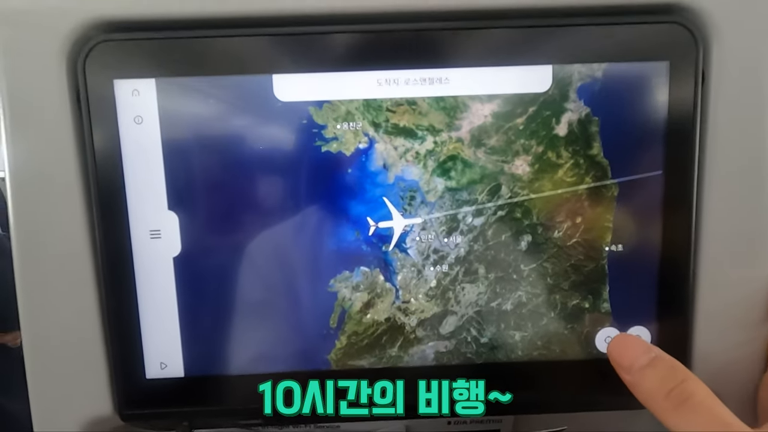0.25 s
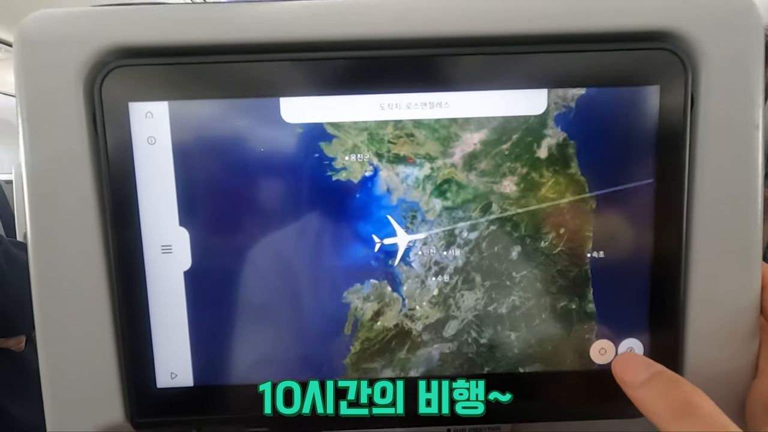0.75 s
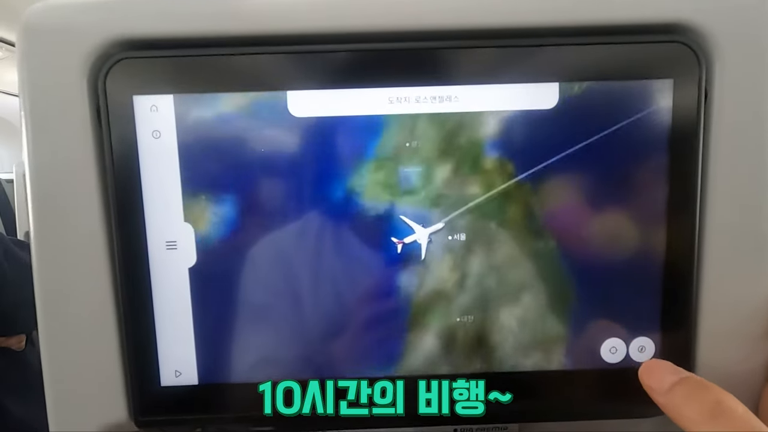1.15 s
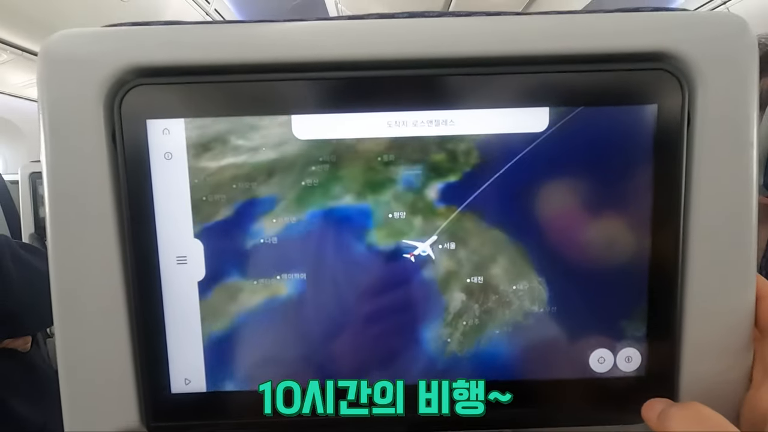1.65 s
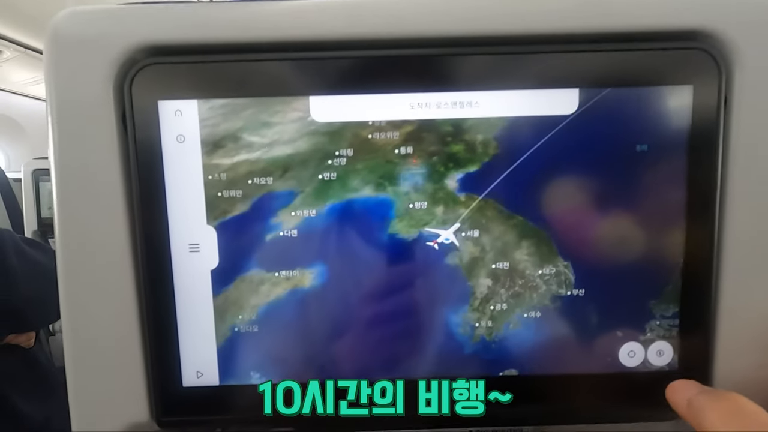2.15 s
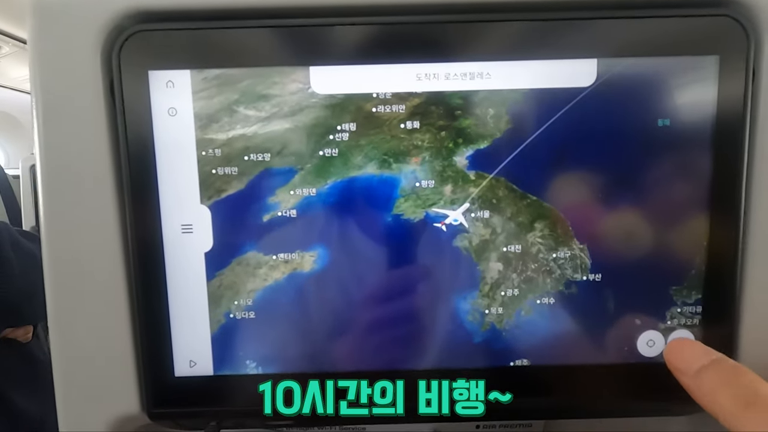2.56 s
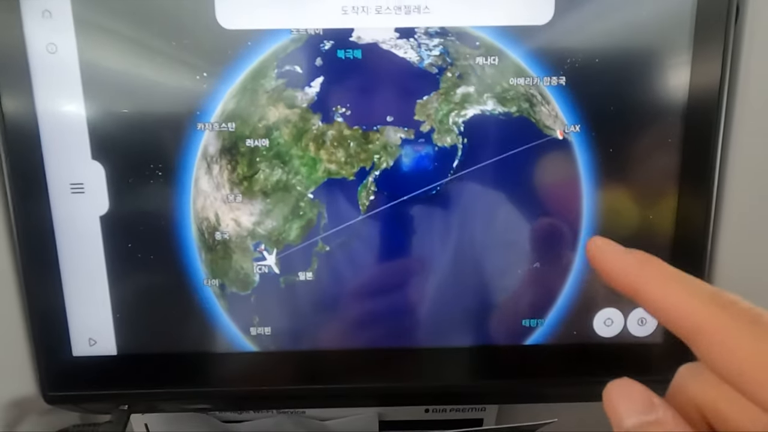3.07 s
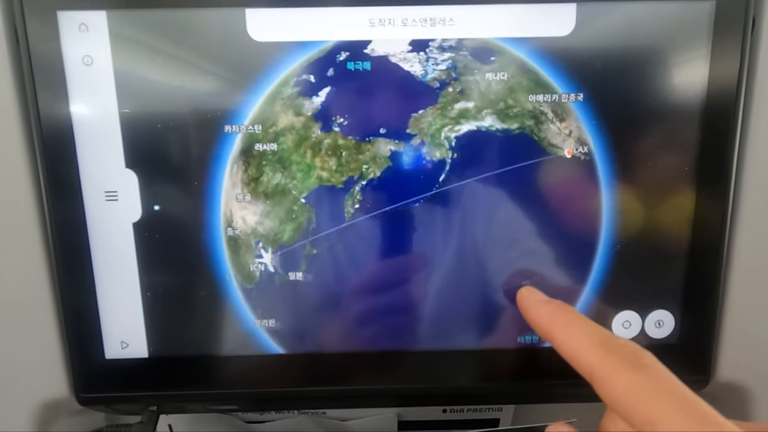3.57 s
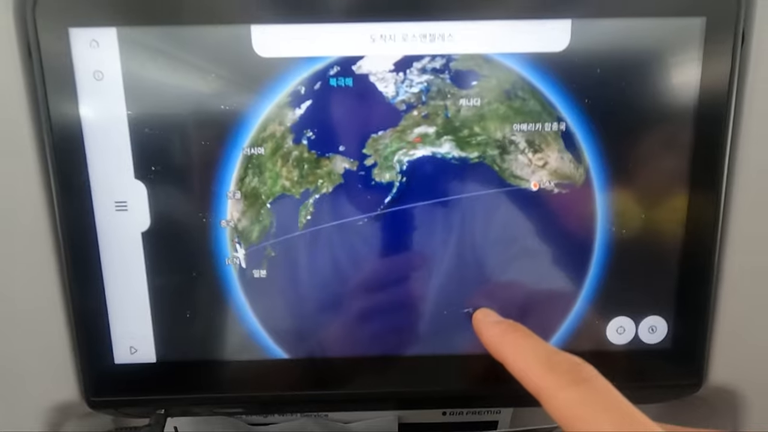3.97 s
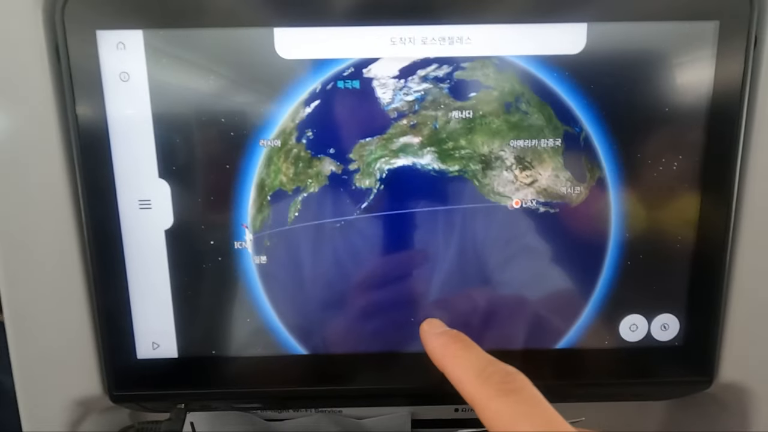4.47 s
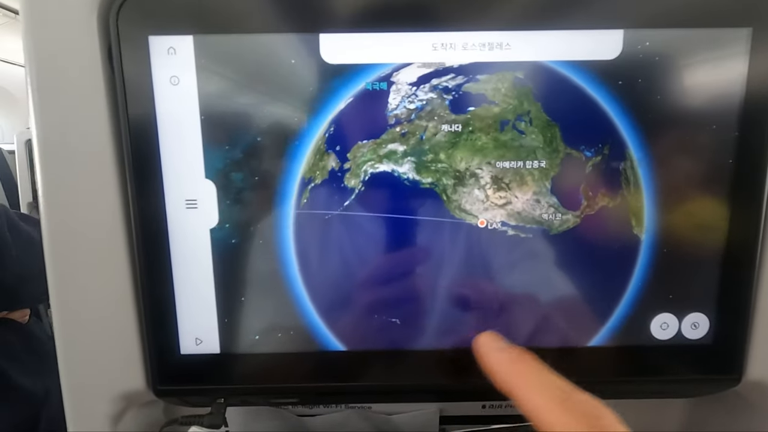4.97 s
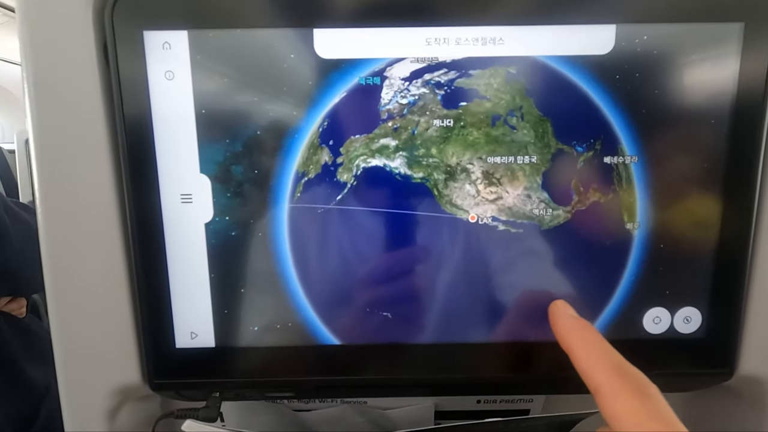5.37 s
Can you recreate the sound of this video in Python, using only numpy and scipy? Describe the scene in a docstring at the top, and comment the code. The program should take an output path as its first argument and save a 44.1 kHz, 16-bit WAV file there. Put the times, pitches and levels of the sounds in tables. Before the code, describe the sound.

Steady low rumble inside a flying passenger plane, cut by one click halfway, with faint touch rustles and a tiny plastic tick.

```python
"""The roar of an airliner cabin in flight: the airframe shudders, the cabin air booms, the wall panels drone.
The roar is noise, coloured by the cabin and split into bands; the boom also holds a wavering note.
Above it are airflow hiss and narrow bands of noise that briefly swell, thin whines (wavering sine tones),
soft rustles and a swish (noise bursts), and a tiny tick with its rebound (dying sine tones).
Halfway, a click jumps to a later moment of the flight: boomier, a little brighter, wide instead of centred."""
import sys
import numpy as np
from scipy import signal
from scipy.fft import irfft
from scipy.io import wavfile
from scipy.ndimage import uniform_filter1d

SR = 44100
rng = np.random.default_rng(int(sys.argv[2]) if len(sys.argv) > 2 else 0)


def wav_out(sig):
    """Save sig, one row per channel (or a flat mono array), as 16-bit PCM at SR to the path in sys.argv[1]."""
    wavfile.write(sys.argv[1], SR, np.round(np.clip(np.atleast_2d(sig).T, -1, 1) * 32767).astype(np.int16))


N = 248194

JUMP_S = 2.79522
TIME = np.arange(N) / SR
LATE = TIME >= JUMP_S
HZ = np.fft.rfftfreq(2 ** 18, 1 / SR)

# basic colour of the roar before and after the jump; the low bands get their final level further on:
# pitch_hz, early_level_db (per Hz), late_level_db (per Hz)
ROAR_COLOUR = [(10, -35, -42.5), (58.7, -43.5, -40.5), (105.9, -46, -47), (186.8, -48, -59.5),
               (229, -59, -59.5), (336, -61.5, -62), (506, -70, -71.5), (990, -76.5, -76.5),
               (2220, -84.5, -83), (3620, -91.5, -91), (4440, -96, -95.5), (7200, -104, -101),
               (8800, -112.5, -111), (13000, -119, -118)]
# resonances of airframe, panels, ducts and trim: pitch_hz, width_hz, early_lift_db, late_lift_db
CABIN_RESONANCES = [(23.2, 8.4, 2, 8.5), (39.2, 13, 9.5, 3.5), (114.7, 11, -2.5, -3.5), (146.8, 26, 8, 4),
                    (181, 17, 4, 7.5), (201.5, 20, 4.5, 6), (233.7, 42, 0.5, -2.5), (299.6, 59, 3.5, 2.5),
                    (425.5, 30, 0, 5.5), (590, 16, 3, 4), (666, 60, 5, 2), (716, 94, -2.5, -4),
                    (830, 23, 3.5, 0.5), (1148, 60, 4, 4.5), (1270, 330, 3.5, 3), (1460, 160, -0.7, 0.9),
                    (1690, 140, -2, -1), (2030, 210, 2.5, 1.8), (5430, 900, 0.5, 2)]
# borders between shudder, boom, drone and rush: pitch_hz
LOW_BAND_EDGES_HZ = [55, 112, 235]
HISS_EDGE_HZ = 1500  # border between rush and hiss
# the stereo image before the jump: pitch_hz, unrelated_part_db, left_lead_rad, left_minus_right_db
EARLY_STEREO = [(300, -100, 0, 0), (450, -50, 0, 0), (900, -39, 0, 0), (1800, -32, 0, 0),
                (10500, -19, 0, 0), (12000, -4, 0, 3)]
# the stereo image after the jump: pitch_hz, unrelated_part_db, left_lead_rad, left_minus_right_db
LATE_STEREO = [(60, -40, 0, .3), (230, -28, .07, .6), (430, -16, .2, 1.7), (600, -12, .15, .5),
               (900, -8, .35, 2.3), (1170, -11, .4, 3), (1550, -7, .35, 2.7), (2700, -7.5, .7, 2.6),
               (5000, -6.5, 0, 1.3), (8000, -4, 0, 3.7), (10000, -9, 0, 1.3), (12000, -3, 0, 5)]
# airframe shudder, the deepest band, before its random swells: start_s, level_db (rms)
SHUDDER_LEVEL = [(0, -24.5), (.5, -22.5), (.72, -23.5), (.9, -17), (1.08, -28.5), (1.33, -25), (1.46, -20),
                 (1.65, -25.5), (2.33, -19.5), (2.8, -27), (3.0, -17), (3.16, -29), (3.3, -21),
                 (3.779, -19.5), (3.92, -21), (4.4, -24), (5.05, -21.5), (5.6, -22)]
# boom of the cabin air, without its note and before random swells: start_s, level_db (rms)
BUFFET_LEVEL = [(0, -27.5), (.25, -23), (.48, -30), (.97, -29.5), (1.1, -25.5), (1.7, -27.5), (2.8, -28),
                (2.88, -22.5), (3.25, -24.5), (3.6, -26), (3.95, -23.5), (4.25, -26), (5.1, -22),
                (5.6, -26.5)]
# the boom's note, which builds up and wanders in pitch: start_s, pitch_hz, level_db (rms)
BOOM_NOTE = [(1.9, 88, -41), (2.4, 85.84, -30), (2.7, 85.66, -24), (2.8, 84.8, -42), (2.88, 76.84, -25),
             (3.3, 77.1, -23.5), (3.6, 75.8, -28.5), (3.92, 77.07, -23), (4.4, 80.8, -23),
             (4.65, 76.43, -23.5), (5.0, 81.74, -21), (5.25, 77.2, -23), (5.6, 68.16, -25)]
# drone of the wall panels, the upper bass, before its random swells: start_s, level_db (rms)
DRONE_LEVEL = [(0, -22), (.5, -22), (.62, -24.7), (.9, -25.5), (1.06, -19), (1.2, -24.5), (1.82, -22),
               (1.92, -25), (2.1, -23.5), (3.65, -24.5), (3.8, -27), (4.22, -21.5), (4.4, -24.5),
               (4.65, -24.5), (4.9, -24), (5.35, -25), (5.6, -24.5)]
# boost or cut of the airflow's lower part, the rush: start_s, gain_db
RUSH_GAIN = [(0, 1), (.35, 0.7), (1.0, 0.1), (2.75, -0.9), (2.9, 0.8), (3.6, 0.5), (4.1, -0.2), (5.0, -0.3),
             (5.6, 0.5)]
# boost or cut of the airflow's treble, the hiss: start_s, gain_db
HISS_GAIN = [(0, 1), (1.1, -0.16), (2.75, -0.3), (2.85, 1.2), (3.0, 1), (3.15, 0.5), (3.37, 1.1),
             (3.55, -0.1), (3.75, 0.8), (4.0, 0.5), (4.45, -0.6), (5.0, 0.3), (5.35, -1.2), (5.6, 2.2)]
# narrow bands of noise that briefly swell and sink back:
# centre_s, half_length_s, pitch_hz, width_hz, level_db (at peak)
NOISE_SWELLS = [(.1, .3, 1150, 60, -51), (0.282, 0.16, 450, 120.5, -48), (0.549, 0.5, 220.5, 26.1, -39),
                (2.8, 0.22, 1430, 90, -59.5), (3.096, .4, 2170, 170, -59.5), (3.497, .2, 377, 70, -46)]
# three whines whose levels vary over time, before their wander: pitch_hz
VARYING_WHINES_HZ = [2569, 5666, 10987]
# their levels, before a lift shared by all whines: start_s, lowest_level_db, middle_level_db, highest_level_db
VARYING_WHINE_LEVELS = [(.2, -76.5, -76, -94), (.6, -70.5, -84, -90), (2.1, -70, -84, -91),
                        (2.35, -64, -85, -96), (2.75, -72, -82, -96), (2.85, -65.5, -75, -88),
                        (3.4, -69, -76, -90.5), (4.1, -70, -76, -86.5), (4.33, -64, -75, -86.5),
                        (4.55, -67, -76, -88), (4.82, -66, -75, -88), (5, -63, -72.5, -84),
                        (5.12, -74, -73, -84.5), (5.6, -68, -75.5, -85)]
# whines with one level before and one after the jump, before the same lift:
# pitch_hz, early_level_db, late_level_db
STEPPED_WHINES = [(4133, -91, -75), (4899, -92, -75.7), (6212, -95, -87), (6374, -88, -88),
                  (7083, -89, -83), (8263, -93, -89), (8500, -90, -90), (9017, -100, -94),
                  (11332, -104, -91)]
# touches of hand and sleeve: peak_s, rise_s, fall_s, level_db (at peak), centre_hz, spread_octaves
RUSTLE_STROKES = [(.6, .049, .049, -74.5, 6500, .27), (1.45, .04, .1, -79, 12100, .14),
                  (1.67, .025, 0.21, -75, 10500, 0.35), (1.8, .012, .025, -79, 12000, .15),
                  (1.86, .005, .009, -74, 12200, 0.079), (2.13, .07, .07, -69, 7000, 0.24),
                  (3.415, .03, .045, -67, 8300, 0.24), (3.53, .035, .035, -70, 7800, .35),
                  (3.788, .014, 0.023, -56.5, 4900, .52), (3.82, .01, .018, -65, 5700, 0.57),
                  (3.985, .018, .018, -67, 6600, .34), (4.015, .014, .04, -64, 6200, .35),
                  (4.05, .012, 0.017, -57, 4300, .45), (4.627, .016, 0.019, -66, 7400, .1),
                  (5.003, .008, .01, -65, 5750, 0.061)]
# resonances of the swish, relative to each other: pitch_hz, width_hz, level_db
SWISH_RESONANCES = [(2900, 800, -0.5), (3980, 750, -2), (7200, 2300, -6), (10600, 2600, -19),
                    (12700, 1200, -21)]
# a plastic tick and its rebound: start_s, level_db
TICK_HITS = [(4.162, -44), (4.167, -51)]
# what the plastic rings with, relative to the hit: pitch_hz, level_db, time_to_fall_60_db_s
TICK_RINGS = [(4480, -3, 0.022), (4780, -2, .02), (7700, -14, .01)]


def amp(db):
    """Turns decibels into a gain."""
    return 10 ** (np.asarray(db) / 20)


def unit(x):
    """Scales a sound to an average strength (rms) of 1."""
    return x / np.sqrt(np.mean(x ** 2) + 1e-20)


def spectra(rows):
    """Joins the rows of a pitch table with straight lines on a log-pitch axis."""
    hz, *columns = np.transpose(rows)
    return [np.interp(np.log(HZ + 1), np.log(hz + 1), column) for column in columns]


def curves(rows):
    """Joins the rows of a time table with straight lines, one value per sample."""
    s, *columns = np.transpose(rows)
    return [np.interp(TIME, s, column) for column in columns]


def below(hz, order=12):
    """Low-pass gain: keeps what is below hz, more sharply with a higher order."""
    return 1 / np.sqrt(1 + (HZ / hz) ** (2 * order))


def white():
    """Random spectrum of a noise that is equally strong at every pitch, 0 dB per Hz."""
    random = rng.standard_normal(len(HZ)) + 1j * rng.standard_normal(len(HZ))
    return random * np.sqrt(SR * len(HZ) / 2)


def wave(spectrum):
    """Turns a spectrum into sound samples."""
    return irfft(spectrum)[..., :N]


def drift(hz):
    """Random wandering around 0, rms 1, with up to about hz swings a second."""
    points = rng.standard_normal(4000)
    # straight lines between random points lose a third of the power: give it back
    return np.interp(2 * hz * TIME, np.arange(len(points)), points) * np.sqrt(3 / 2)


def stroke(peak_s, rise_s, fall_s):
    """Loudness of a brush: a smooth hump that rises to its peak and falls away."""
    return np.exp(-((TIME - peak_s) / np.where(TIME < peak_s, rise_s, fall_s)) ** 2)


def steadied(x, span_s):
    """Evens out slow swells to rms 1 and leaves the fast flutter."""
    size = max(int(span_s * SR), 2)
    power = (x ** 2).mean(0)
    smooth_power = uniform_filter1d(uniform_filter1d(power, size), size)
    return x / np.sqrt(abs(smooth_power) + 1e-12)


def diffuse(stereo):
    """Noise at two close microphones: long bass waves reach both more alike than short treble waves."""
    apart_db, lead_rad, lean_db = spectra(stereo)
    shared = white()
    unrelated = amp(apart_db) * white()
    tilt = amp(lean_db / 2) * np.exp(.5j * lead_rad)
    return np.array([(shared + unrelated) * tilt, (shared - unrelated) / tilt])


def whines(level_db=1.0, wander_hz=2.5, fade_db=2.0):
    """Fans and electrics give thin tones that waver, and flutter in the cabin's standing waves."""
    out = np.zeros((2, N))
    varying = list(zip(VARYING_WHINES_HZ, curves(VARYING_WHINE_LEVELS)))
    stepped = [(hz, np.where(LATE, late_db, early_db)) for hz, early_db, late_db in STEPPED_WHINES]
    for hz, db in varying + stepped:
        angle = 2 * np.pi * np.cumsum(hz + wander_hz * drift(12)) / SR
        fade = drift(9)
        sway = LATE * drift(2.7)  # left and right move oppositely, only after the jump
        flutter_db = fade_db * np.array([fade + sway, fade - sway])
        out += np.sqrt(2) * amp(db + level_db + flutter_db) * np.sin(angle)
    return out


def noise_swells():
    """Narrow bands of noise that briefly swell and sink back."""
    out = np.zeros((2, N))
    early, late = diffuse(EARLY_STEREO), diffuse(LATE_STEREO)
    for centre_s, half_s, hz, width_hz, db in NOISE_SWELLS:
        colour = 1 / (1 + ((HZ - hz) / width_hz * np.sqrt(2)) ** 2) ** 2
        noise = late if centre_s > JUMP_S else early
        out += amp(db) * stroke(centre_s, half_s, half_s) * unit(wave(colour * noise))
    return out


def rustles(grain_db=1.5):
    """Hand and sleeve rub softly: short bursts of friction noise, made grainy by fast flicker."""
    out = np.zeros((2, N))
    grain = unit(amp(grain_db * drift(220)))
    early, late = diffuse(EARLY_STEREO), diffuse(LATE_STEREO)
    for peak_s, rise_s, fall_s, db, hz, octaves in RUSTLE_STROKES:
        colour = np.exp(-.5 * (np.log2((HZ + 1) / hz) / octaves) ** 2)
        noise = late if peak_s > JUMP_S else early
        out += amp(db) * stroke(peak_s, rise_s, fall_s) * unit(wave(colour * noise))
    return out * grain


def swish(peak_s=1.246, rise_s=0.012, fall_s=0.018, tail_s=.034, body_db=-51, hiss_db=-59.5):
    """One quick brush: resonant noise with a hollow body, and a brighter hiss that trails on."""
    colours = np.array([amp(db) / (1 + (2 * (HZ - hz) / width_hz) ** 2)
                        for hz, width_hz, db in SWISH_RESONANCES])
    hollow = np.array([hz < 5000 for hz, _, _ in SWISH_RESONANCES])
    body = unit(wave(colours[hollow].sum(0) * diffuse(EARLY_STEREO)))
    hiss = unit(wave(colours[~hollow].sum(0) * diffuse(EARLY_STEREO)))
    hollow_brush = amp(body_db) * stroke(peak_s, rise_s, fall_s) * body
    bright_brush = amp(hiss_db) * stroke(peak_s, rise_s, tail_s) * hiss
    return hollow_brush + bright_brush


def ticks(contact_s=.0004):
    """Plastic ticks and rebounds: each hit starts a few tones that die away fast."""
    out = np.zeros(N)
    for start_s, hit_db in TICK_HITS:
        t = np.maximum(TIME - start_s, 0)
        ring = sum(amp(hit_db + db - 60 * t / t60_s) * np.sin(2 * np.pi * hz * t)
                   for hz, db, t60_s in TICK_RINGS)
        out += (1 - np.exp(-t / contact_s)) * ring  # soft start
    return out


def click(step_db=-13.5, settle_s=0.0028):
    """The jump is a sudden step in pressure, heard as one dry click."""
    t = TIME - JUMP_S
    return amp(step_db) / 2 * np.sign(t) * np.exp(-abs(t) / settle_s)


def turbulence(roar_db, lifts_db, stereo, lowest_hz=7, top_hz=13100):
    """Air rushing along the skin and from the vents: noise coloured by the cabin, split into five bands."""
    peaks_db = sum(db / (1 + (2 * (HZ - hz) / width_hz) ** 2)
                   for (hz, width_hz, *_), db in zip(CABIN_RESONANCES, lifts_db))
    limits = (1 - below(lowest_hz, order=3)) * below(top_hz, order=30)
    roar = diffuse(stereo) * amp(roar_db + peaks_db) * limits
    # each band is what one low-pass keeps and the previous one does not
    low_passes = [below(hz) ** 2 for hz in LOW_BAND_EDGES_HZ + [HISS_EDGE_HZ]]
    bands = np.diff([0 * HZ] + low_passes + [0 * HZ + 1], axis=0)
    return np.array([wave(roar * band) for band in bands])


def boom(buffet, waver_hz=2.0, hold_s=0.11):
    """A standing wave of the cabin air, unsteady in pitch, merges with the buffeting into one firm hum."""
    hz, note_db = curves(BOOM_NOTE)
    # after the jump the note leans to one side like the rest of the bass
    lean_db = LATE * LATE_STEREO[0][-1] * np.array([[.5], [-.5]])
    angle = 2 * np.pi * np.cumsum(hz + waver_hz * drift(5)) / SR
    note = np.sqrt(2) * amp(note_db + lean_db) * np.sin(angle)
    joint_level = np.hypot(amp(note_db), amp(curves(BUFFET_LEVEL)[0]))
    return joint_level * steadied(note + buffet, hold_s)


def cabin(span_s=0.17, eddies_db=0.54, swells_db=0.5, swells_per_s=3.5):
    """Each low band of the roar swells and sinks on its own, while the airflow stays nearly even."""
    early_db, late_db = spectra(ROAR_COLOUR)
    _, _, early_lifts_db, late_lifts_db = np.transpose(CABIN_RESONANCES)
    late = turbulence(late_db, late_lifts_db, LATE_STEREO)
    early = turbulence(early_db, early_lifts_db, EARLY_STEREO)
    *lows, rush, hiss = np.where(LATE, late, early)
    levels = [SHUDDER_LEVEL, BUFFET_LEVEL, DRONE_LEVEL]
    shudder, buffet, drone = (
        amp(curves(level)[0] + swells_db * drift(swells_per_s)) * steadied(low, span_s)
        for low, level in zip(lows, levels))
    airflow = amp(curves(RUSH_GAIN)[0]) * rush + amp(curves(HISS_GAIN)[0]) * hiss
    # the bass gives way to the click for a few milliseconds
    gap = 1 - np.exp(-((TIME - JUMP_S) / .002) ** 2)
    bass = gap * (shudder + boom(buffet) + drone)
    return bass + amp(eddies_db * drift(11)) * airflow


def scene():
    """Adds the small sounds to the roar of the cabin."""
    return whines() + noise_swells() + rustles() + swish() + ticks() + click() + cabin()


def record(dry, edge_hz=15000):
    """Fades the very ends softly and takes away the treble above edge_hz."""
    ends = signal.windows.tukey(N, .001)
    low_pass = signal.firwin(511, edge_hz, window=("kaiser", 9), fs=SR)
    return signal.oaconvolve(dry * ends, low_pass[None], "same", axes=1)


dry = scene()
out = record(dry)
wav_out(out)
```